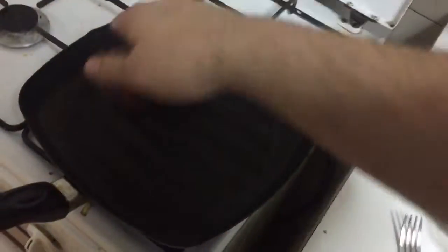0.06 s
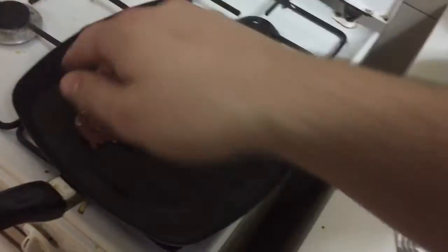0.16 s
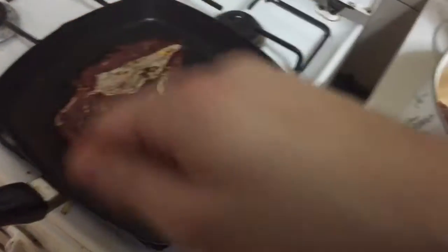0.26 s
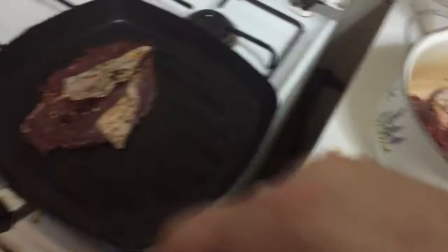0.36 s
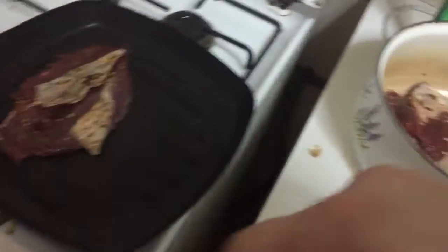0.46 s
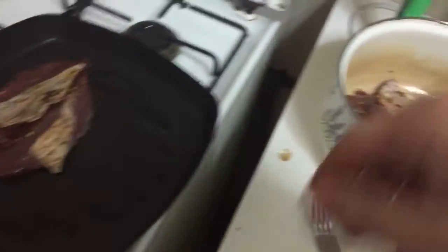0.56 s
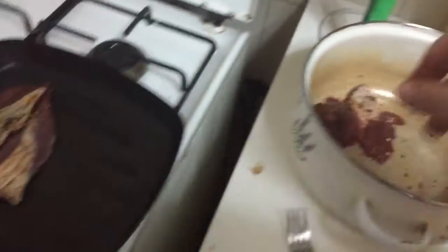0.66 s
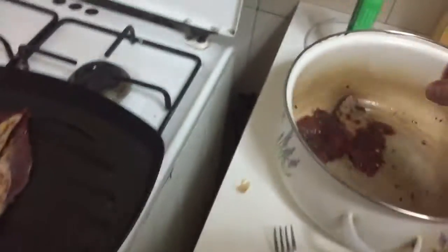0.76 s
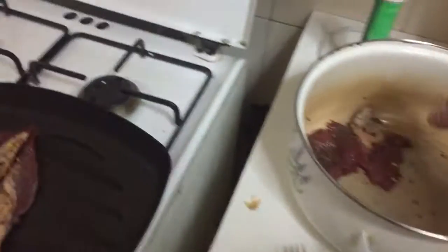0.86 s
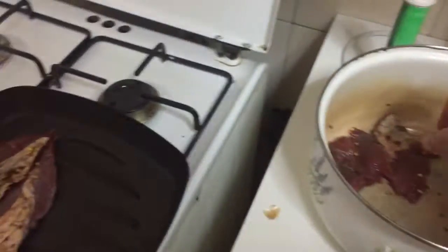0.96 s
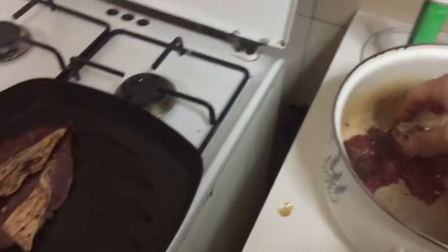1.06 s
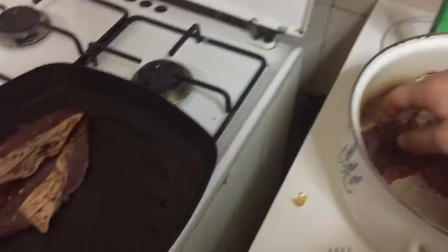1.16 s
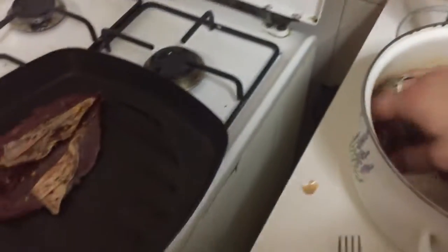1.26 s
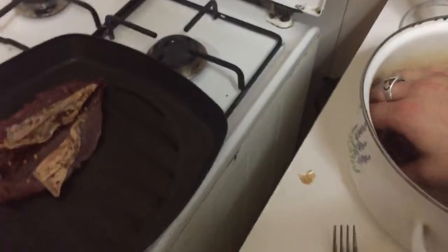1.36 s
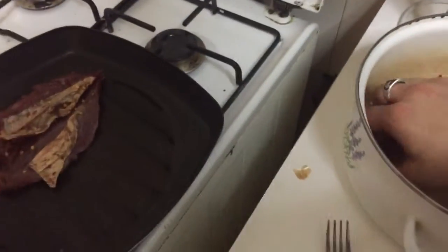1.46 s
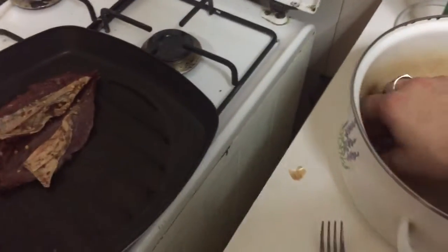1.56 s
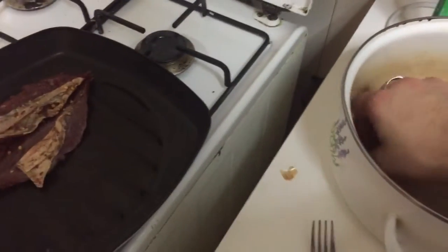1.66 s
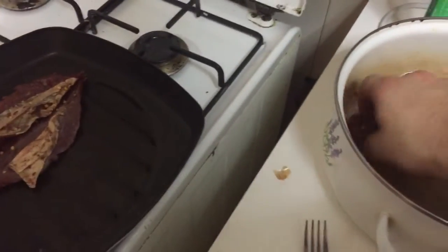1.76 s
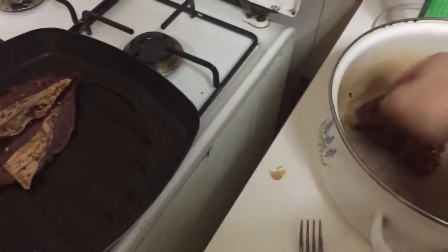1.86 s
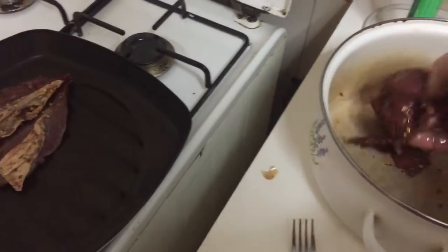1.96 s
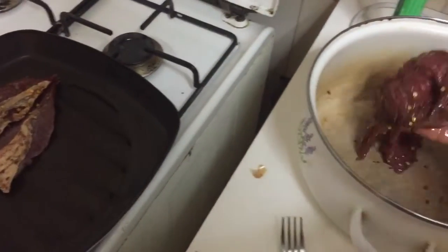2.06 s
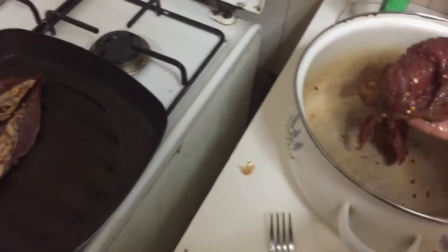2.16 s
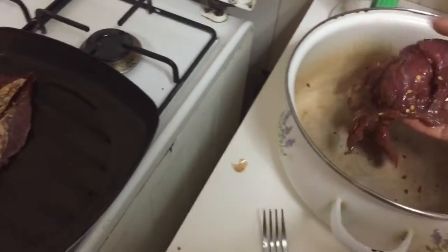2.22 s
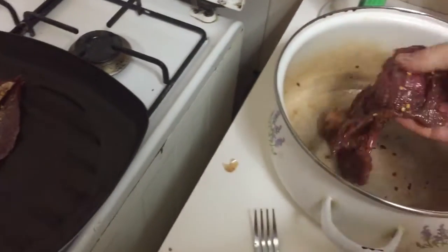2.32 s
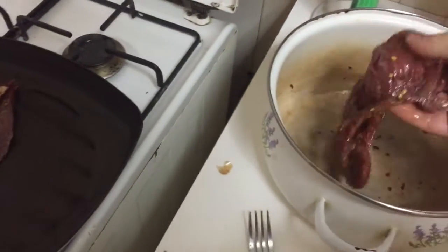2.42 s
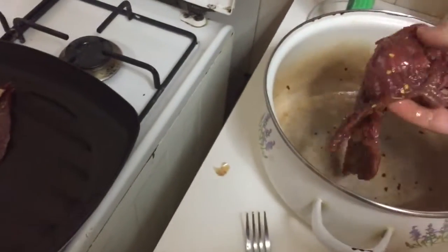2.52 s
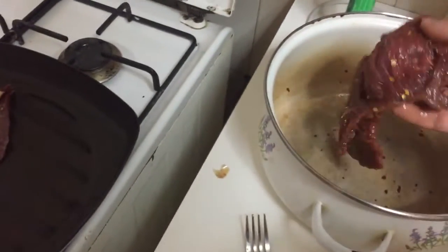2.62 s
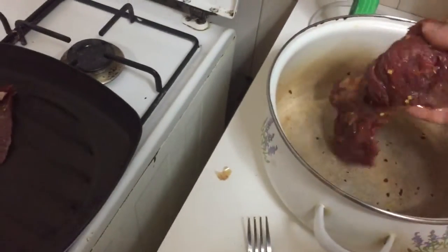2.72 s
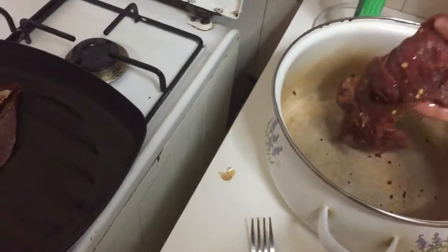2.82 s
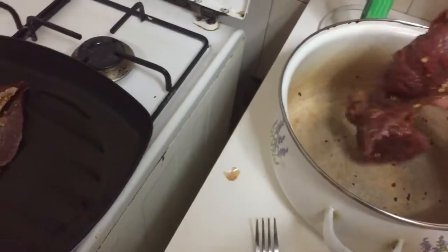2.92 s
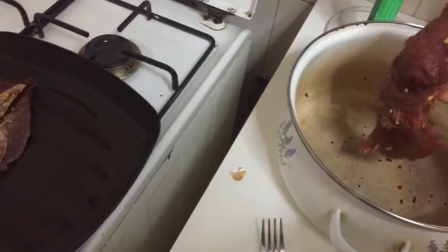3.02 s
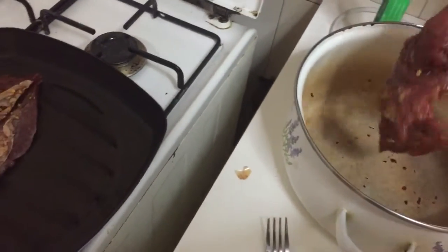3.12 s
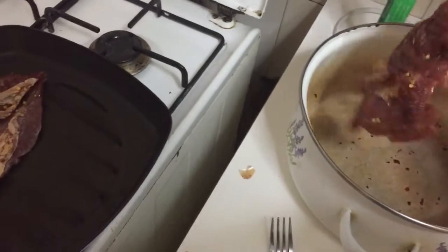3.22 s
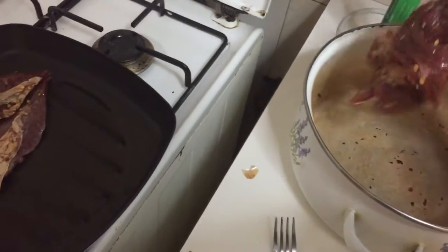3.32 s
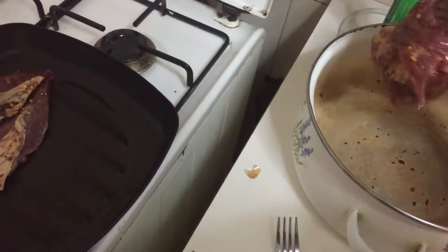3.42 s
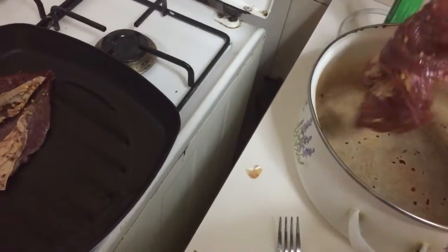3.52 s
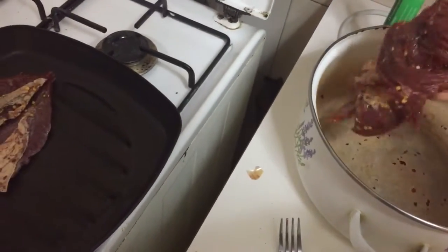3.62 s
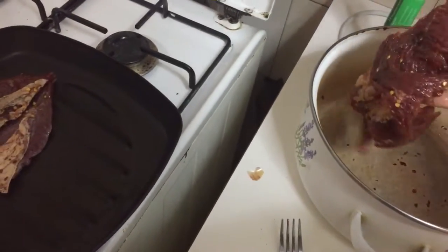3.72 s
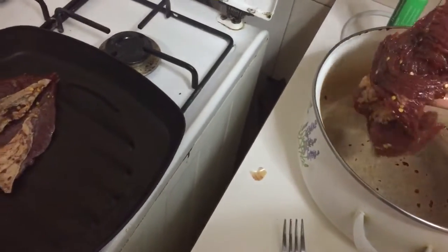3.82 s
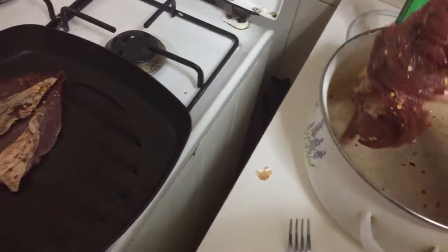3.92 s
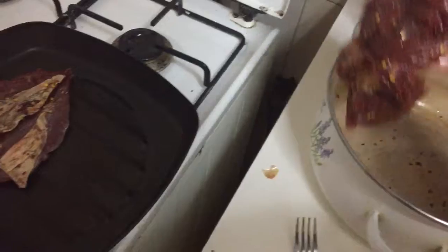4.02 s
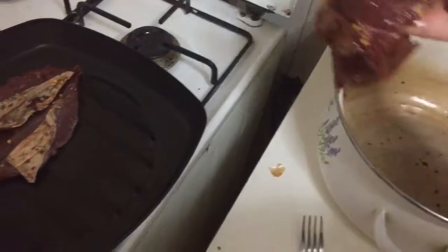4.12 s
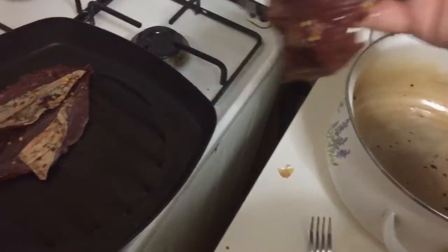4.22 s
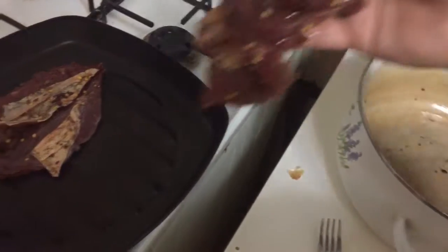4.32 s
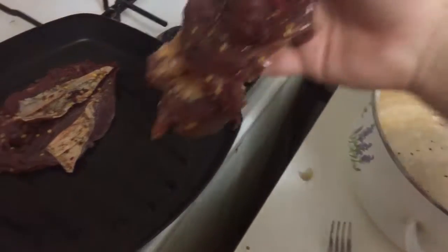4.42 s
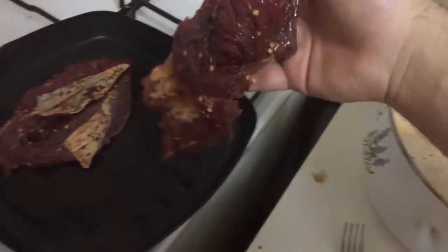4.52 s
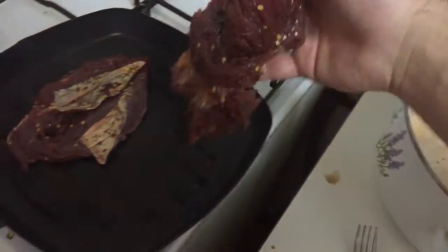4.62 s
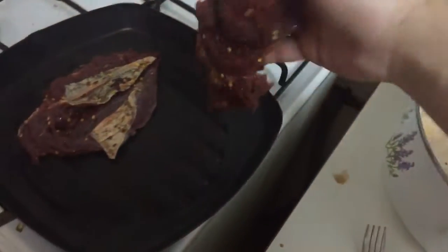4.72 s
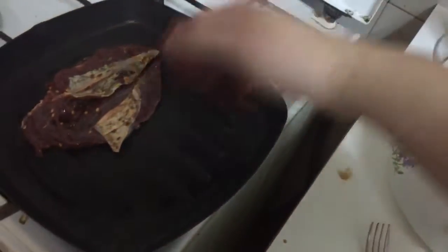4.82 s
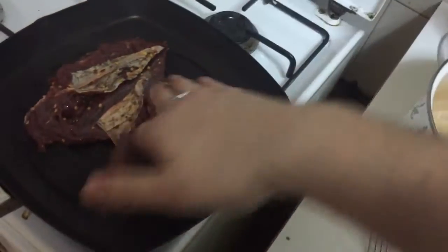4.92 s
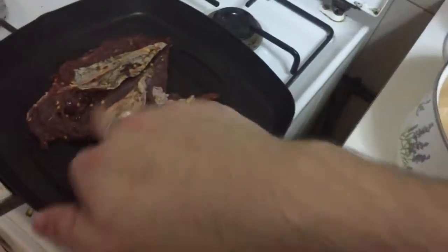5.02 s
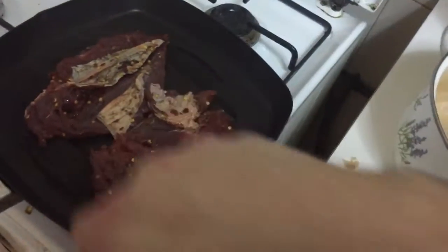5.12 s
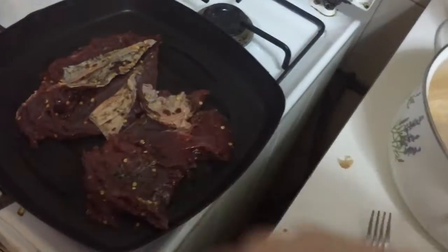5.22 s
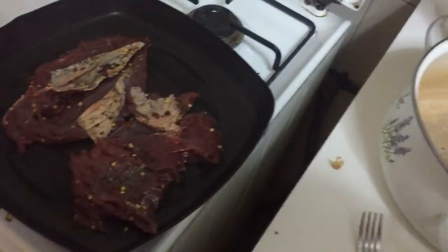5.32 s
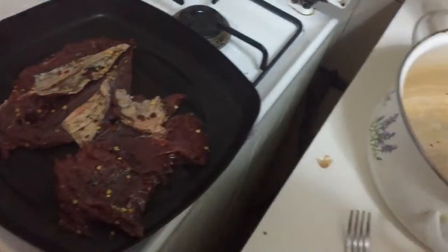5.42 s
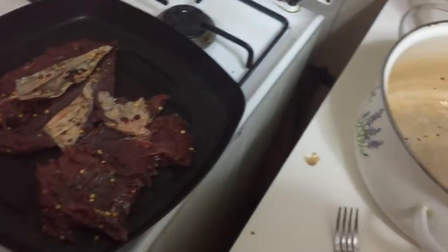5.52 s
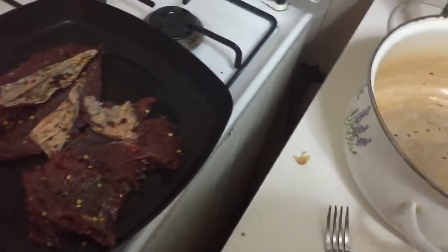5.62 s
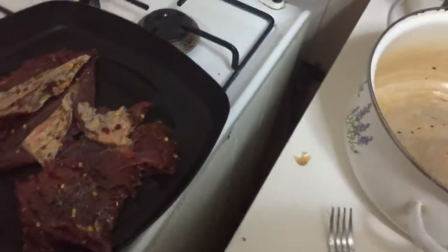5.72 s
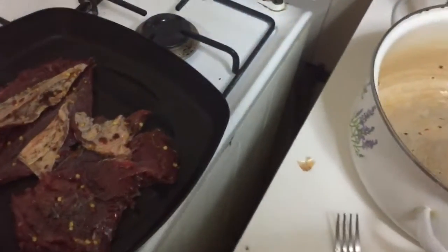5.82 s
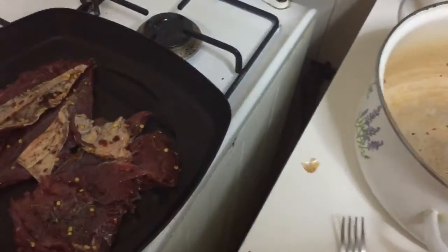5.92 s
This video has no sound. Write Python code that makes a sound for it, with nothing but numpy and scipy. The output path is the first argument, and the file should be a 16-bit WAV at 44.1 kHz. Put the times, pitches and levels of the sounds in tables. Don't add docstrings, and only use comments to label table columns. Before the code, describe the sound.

In a small kitchen, faint metal rings and a low gas rumble precede a fluttering slap as wet meat touches a very hot iron pan. Loud bright sizzling bursts out at once and continues with sharp pops and soft fat thumps. Around five seconds a second slice slaps down harder, and the sizzle grows fuller. Close microphone, short room reflections, nearly mono.

```python
import sys
import numpy as np
from scipy import signal
from scipy.fft import rfft, irfft, next_fast_len
from scipy.io import wavfile
from scipy.ndimage import uniform_filter1d, map_coordinates

SR = 44100
rng = np.random.default_rng(int(sys.argv[2]) if len(sys.argv) > 2 else 0)


def volts_from_db(level):
    exponent = np.asarray(level, float) / 20
    return 10 ** exponent


def int16_out(signal):
    q = np.round(np.clip(np.atleast_2d(signal).T, -1, 1) * 32767)
    wavfile.write(sys.argv[1], SR, q.astype(np.int16))


N = 263521
TIME = np.arange(N) / SR
DURATION_S = N / SR

# frequency_hz, density_db
FLAME_SPECTRUM = [(15, -35), (25, 10), (54, 16), (149, -7), (178, -16), (211, -7), (325, -3), (377, -40),
                  (400, -20.5), (520, -38), (880, -120)]
# frequency_hz, density_db
ROOM_SPECTRUM = [(88, -3), (150, -5), (201, -10.5), (264, -23), (429, -11), (784, -18), (881, -16),
                 (1250, -13.5), (2890, -24), (15700, -35)]
# peak_s, level_db, pitch_hz, width_hz, t60_s
STOVE_HUMS = [
    (.36, -46.5, 116, 18, 1.13),
    (.66, -61, 64.6, 5.8, 2.5),
    (1.27, -49, 63.5, 9.8, .4),
    (5.95, -45, 75, 32, .4),
]
# start_s, level_db, pitch_hz, t60_s
METAL_PINGS = [
    (0.0, -60, 1110, .4),
    (0.03, -56, 1110, .15),
    (0.143, -54, 1590, .13),
    (0.143, -57, 1982, .08),
    (0.195, -56, 580, .09),
]
# start_s, thump_db
FAT_DROPS = [
    (0.8406, -38.5),
    (1.4062, -52),
    (2.9818, -30.5),
    (3.9754, -45),
    (5.4889, -34),
    (5.8519, -44.5),
    (5.9737, -46),
]
# start_s, peak_db
LOUD_POPS = [(0.3074, -12), (.502, -10), (1.408, -7), (1.995, -8), (2.9825, -8), (3.4087, -12),
             (3.8599, -10), (3.976, -8), (4.5188, -10), (4.718, -11), (4.8842, -12), (4.957, -10),
             (5.1271, -12), (5.522, -7), (5.6617, -5), (5.719, -6)]
# start_s, level_db, t60_s
STEAM_JETS = [
    (.236, -38, .006),
    (2.9823, -13, .005),
    (2.9893, -30, .006),
    (3.0968, -17, 0.006),
    (5.057, -36, .012),
    (5.108, -26, 0.0088),
    (5.199, -25, .008),
    (5.573, -30, .006),
]
# pitch_hz, width_hz, first_slice_db, second_slice_db
PAN_MODES = [(74, 39, -4, -11), (107, 36, 1, -0.5), (198, 12, 1, -3), (242.7, 9.3, 5, 4.5),
             (337, 23, -1, -8), (413, 12, -1, 0.5), (479, 36, -7, -7), (620, 21, 0, -6), (720, 48, -8, -15),
             (842, 45, 5.5, 1)]
# start_s, blow_db
STEAM_SLAPS = [(0.231, -45), (0.246, -34.5), (0.262, -31.5), (.278, -32), (.29, -33), (0.314, -33),
               (.323, -33), (0.342, -30), (0.366, -31.5), (0.396, -38), (0.429, -40), (5.058, -41),
               (5.073, -35), (5.085, -30), (5.105, -25), (5.121, -22.5), (5.145, -21.5), (5.171, -25.5),
               (5.194, -23), (5.21, -29), (5.229, -26), (5.256, -37), (5.276, -30.5), (5.351, -36)]
# start_s, large_bubble_gush_db
SLICE_LANDINGS = [
    (.232, 24),
    (5.051, 16),
]
# time_s, vigour_db, fine_spray_db (spray reaching the microphone as the camera turns)
BOIL_VIGOUR = [(.212, -66, 12), (.25, -43, 2), (.29, -36, 0), (.39, -36.5, -2), (.5, -33.5, 1.5),
               (1.42, -34.5, 0), (1.55, -36, 0), (3.1, -38, 1.5), (3.4, -37.5, 2.5), (3.52, -38, 0),
               (4.01, -38, 2.5), (4.07, -39, 1), (4.33, -37.5, 3), (4.73, -38.5, -.5), (5.09, -38.5, 1),
               (5.22, -36, 0), (5.31, -31, -1.5), (5.98, -30.5, -3)]
# frequency_hz, density_db
LARGE_BUBBLES = [(400, -33), (740, -18.5), (853, -3), (960, -2.5), (1210, -4), (1280, -2), (1410, -2),
                 (1540, 5), (1720, 2), (2440, 3), (3600, -3.5)]
# frequency_hz, density_db
SMALL_BUBBLES = [(2600, -18), (3100, -9), (3800, 0), (4900, -4.5), (5250, -2), (6400, 1), (7500, -2.5),
                 (9300, 3.5), (10000, 2.5), (10450, 0), (11000, 4), (12200, 3), (13500, 2), (16000, 2.5)]
# frequency_hz, gain_db
WET_COLOUR = [(900, -1), (1550, -5), (2300, -4), (3300, 0.5), (6400, -1), (8000, -0.5), (9600, 0),
              (11000, -1.5)]
# frequency_hz, gain_db
SECOND_COLOUR = [(1100, -5), (1900, 2.5), (2400, -1), (3100, -9.5), (4100, 1.5), (5000, 0), (6300, 1.5),
                 (7900, -1.5), (9500, -4.5), (12000, -2)]
# pitch_hz, width_hz, level_db
RIB_MODES = [(306, 92, 0), (414, 22.4, 2.5), (505, 55, 0), (593, 27, 6), (672, 24, 1)]


def unit(x):
    return x / np.sqrt(np.mean(x ** 2) + 1e-20)


def along(points, hz):
    f, db = np.transpose(points)
    return volts_from_db(np.interp(np.log(hz + 1), np.log(f + 1), db))


def curves(rows):
    s, first, *others = np.transpose(rows)
    return [np.interp(TIME, s, first, -140, -140)] + [np.interp(TIME, s, c) for c in others]


def wobble(rate):
    knots = rng.standard_normal(int(N * rate / SR) + 4)
    return map_coordinates(knots, [TIME * rate])


def filtered(x, response):
    size = next_fast_len(N + SR // 2)
    return irfft(rfft(x, size) * response(np.fft.rfftfreq(size, 1 / SR)), size)[..., :N]


def above(hz, edge_hz):
    return 1 / (1 + (edge_hz / (hz + 1)) ** 16)


def resonances(modes):
    def response(f):
        total = 0
        for k, (hz, width, db) in enumerate(modes):
            damping = 1j * f * width
            total = total + (-1) ** k * volts_from_db(db) * damping / (hz * hz - f * f + damping)
        return total
    return response


def patchy(depth_db, bins=8, frames=10):
    z = signal.stft(rng.standard_normal(N), nperseg=512)[2]
    field = uniform_filter1d(rng.standard_normal(z.shape), size=bins, axis=0)
    field = uniform_filter1d(field, size=frames, axis=1)
    return unit(signal.istft(z * volts_from_db(depth_db * unit(field)), nperseg=512)[1][:N])


def bubbles(count, low_hz, high_hz, cycles, spread_db, size):
    u, t = rng.random((count, 3)), np.arange(size) / SR
    hz = (low_hz + (high_hz - low_hz) * u[:, 1])[:, None]
    strength = volts_from_db(spread_db * u[:, 2:] ** 2) * np.sqrt(hz)
    age = t * hz / cycles
    envelope = strength * age * np.exp(-2 * age) * np.hanning(2 * size)[size:]
    ring = envelope * np.sin(2 * np.pi * hz * t * (1 + 0.017 * age))
    at = (u[:, :1] * N).astype(int) + np.arange(size)
    return unit(np.bincount(at.ravel(), ring.ravel(), N + size)[:N])


def kitchen():
    flame = filtered(rng.standard_normal(N), lambda f: along(FLAME_SPECTRUM, f))
    flame = unit(flame * volts_from_db(0.78 * wobble(8)))
    flame_db = -68.5 + 7 * wobble(0.95)
    hiss = unit(filtered(patchy(0.98), lambda f: along(ROOM_SPECTRUM, f)))
    out = volts_from_db(flame_db) * flame + volts_from_db(-64.5) * hiss
    swell_db_per_s = 250
    for s, db, hz, width, t60 in STOVE_HUMS:
        fall_db = np.where(TIME < s, swell_db_per_s * (s - TIME), 60 * (TIME - s) / t60)
        mode = resonances([(hz, width, 0)])
        hum = unit(filtered(rng.standard_normal(N), lambda f: mode(f) ** 2))
        out += volts_from_db(db - fall_db) * hum
    return out


def walls(x, count=12):
    out, t = x.copy(), np.arange(SR // 5) / SR
    t60_s, first_echo_s, level_db = 0.078, .0015, -11
    for k in range(count + 1):
        share = np.clip(1 - np.abs(np.arange(N) * count / N - k), 0, 1) ** .5
        tail = volts_from_db(-60 * t / t60_s) * rng.standard_normal(len(t)) * (t > first_echo_s)
        tail *= volts_from_db(level_db) / np.linalg.norm(tail)
        part = np.flatnonzero(share)
        start = part[0]
        answer = signal.fftconvolve((share * x)[part], tail)[:N - start]
        out[start:start + len(answer)] += answer
    return out


def pings():
    out = np.zeros(N)
    for s, db, hz, t60 in METAL_PINGS:
        t = np.maximum(TIME - s, 0)
        rise = 1 - np.exp(-t / 0.0044)
        out += volts_from_db(db - 60 * t / t60) * rise * np.sin(2 * np.pi * hz * t)
    return out


def spatter():
    low, thin, t = np.zeros(N + SR), np.zeros(N + SR), np.arange(SR // 10) / SR
    swings = np.log1p(t / .00092) / np.log(1.85)
    thump = 1.75 * np.sin(np.pi * swings) * np.exp(-t / .014) * (1 - np.exp(-t / .0004))
    for s, db in FAT_DROPS:
        low[round(s * SR):][:len(t)] += volts_from_db(db) * thump

    small_pops = [(s * (DURATION_S - 1) + .5, -14 + 8 * (u - .5)) for s, u in rng.random((14, 2))]
    pop_hz = 10200
    click = -np.cos(2 * np.pi * pop_hz * (t[:5] - 1.8 / SR)) * np.hanning(9)[2:7]
    for s, db in LOUD_POPS + small_pops:
        crack = 0.55 * volts_from_db(-60 * t / 0.0025) * rng.standard_normal(len(t))
        crack[:5] = click
        thin[round(s * SR) - 2:][:len(t)] += volts_from_db(db - 6) * crack
    for s, db, t60 in STEAM_JETS:
        thin[round(s * SR):][:len(t)] += volts_from_db(db - 60 * t / t60) * rng.standard_normal(len(t))
    return low[:N] + filtered(thin[:N], lambda f: above(f, 1500) ** 0.2)


def flutter():
    drive, smack, modes = np.zeros((2, N)), np.zeros(N), np.array(PAN_MODES)
    hard_start, hard_end, soften_s = 1.4, 0.18, 0.033
    dull_hz, sharp_hz, puff_s = 250, 1510, .012
    smack_db, smack_hz = -0.5, 900
    for s, db in STEAM_SLAPS:
        which = int(s > DURATION_S / 2)
        since = max(s - SLICE_LANDINGS[which][0], 0)
        bright = np.clip(hard_end + (hard_start - hard_end) * np.exp(-since / soften_s), 0, 1)
        near = slice(round((s - .01) * SR), round((s + .08) * SR))
        t = TIME[near] - s + .004
        contact_s = 0.0012 / (1 + 5 * bright)
        push = np.exp(-(t / contact_s) ** 2) * 0.0013 / contact_s
        puff = volts_from_db(11.5) * np.exp(-np.abs(t) / puff_s) * (t > 0) * rng.standard_normal(len(t))
        edge_hz = dull_hz + (sharp_hz - dull_hz) * bright
        puff = signal.lfilter(*signal.butter(2, edge_hz, fs=SR), puff)
        drive[which, near] += volts_from_db(db) * (puff - push)
        smack[near] -= volts_from_db(db + smack_db) * push * bright
    bare = filtered(smack, lambda f: f / (f + smack_hz))
    first = filtered(drive[0], resonances(modes[:, :3]))
    second = filtered(drive[1], resonances(modes[:, [0, 1, 3]]))
    return bare + first + second


def boiling():
    spit_db, aim_db = curves(BOIL_VIGOUR)
    spray_db = spit_db + aim_db + 2
    gush_rise_s, gush_fade_s = .004, .014
    gush_db = 0
    for s, db in SLICE_LANDINGS:
        rise = np.clip((TIME - s) / gush_rise_s, 0, 1)
        gush_db = gush_db + db * rise * np.exp(-np.maximum(TIME - s, 0) / gush_fade_s)
    excess_db = spit_db + 38
    large_db = -42 + gush_db + np.minimum(0.82 * excess_db, 6 + excess_db)

    (first_s, _), (later_s, _) = SLICE_LANDINGS
    wet_s, drying_s, spread_s, second_share = 0.32, 0.5, 0.33, 0.69
    fresh = np.clip(1 - (TIME - first_s - wet_s) / drying_s, 0, 1)
    second = second_share * np.clip((TIME - later_s) / spread_s, 0, 1)
    return spray_db, spit_db, large_db, fresh, second


def sizzle():
    spray_db, spit_db, large_db, fresh, second = boiling()
    ruptures = unit(-volts_from_db(20 * rng.random(N) ** 2) * (rng.random(N) < .02))
    rings = bubbles(count=9000, low_hz=298, high_hz=15530, cycles=4.2, spread_db=5.5, size=256)
    squeaks = bubbles(count=2500, low_hz=376, high_hz=15710, cycles=68, spread_db=-8, size=1200)
    hiss = patchy(1.58, bins=3, frames=24)
    burst = volts_from_db(0.077 * wobble(40) + 0.14 * wobble(9.9))
    boil = burst * (hiss + volts_from_db(-8.5) * ruptures + volts_from_db(-7.5) * rings + volts_from_db(-15) * squeaks)
    wet = filtered(boil, lambda f: along(WET_COLOUR, f))
    later = filtered(boil, lambda f: along(SECOND_COLOUR, f))
    boil = (1 - fresh - second) * boil + fresh * wet + second * later

    spray = filtered(boil, lambda f: along(SMALL_BUBBLES, f) * above(f, 9580) ** .5)
    spit = filtered(boil, lambda f: along(SMALL_BUBBLES, f) * np.abs(above(f, 2900) - above(f, 8300)) ** .5)
    large = filtered(boil, lambda f: along(LARGE_BUBBLES, f) * (1 - above(f, 3230)) ** .5)
    large *= volts_from_db(0.37 * wobble(5.9))
    ribs = resonances(RIB_MODES)
    iron = patchy(6.9, bins=2, frames=8) + volts_from_db(-3) * ruptures
    iron = filtered(iron, lambda f: ribs(f) * (1 - above(f, 716)))
    low = unit(large) + volts_from_db(-21.5) * unit(iron)
    return volts_from_db(spray_db) * unit(spray) + volts_from_db(spit_db) * unit(spit) + volts_from_db(large_db) * low


def scene():
    mono = kitchen() + pings() + spatter() + flutter() + walls(sizzle())
    return np.array([mono, mono])


def low_pass(x):
    return signal.sosfilt(signal.butter(12, 17080, fs=SR, output="sos"), x)


def record(dry):
    side = np.zeros(N)
    for when, where in rng.random((18, 2)):
        s = .5 + when * (DURATION_S - 1)
        low_hz = 4600 + where * (13500 - 4600)
        high_hz = low_hz * 1.18
        near = slice(round(s * SR) - 4096, round(s * SR) + 2048)
        f = np.fft.rfftfreq(6144, 1 / SR)
        block = np.cos(np.pi / 2 * np.clip((TIME[near] - s) / .023, -1, 1))
        band = irfft(rfft(dry[0, near]) * (f > low_hz) * (f < high_hz))
        usual, swapped = block * band, block * band[::-1]
        side[near] += volts_from_db(-3.0) * swapped * np.sqrt(np.mean(usual ** 2) / np.mean(swapped ** 2))

    def response(f):
        top_hz, edge_hz, bottom_hz = 15710, 90, 38
        top = np.sin(np.pi / 2 * np.clip((top_hz + edge_hz / 2 - f) / edge_hz, 0, 1)) ** 2
        return top / (1 + (bottom_hz / (f + 1)) ** 4)

    return low_pass(filtered(dry + [side, -side], response))


dry = scene()
out = record(dry)
int16_out(out)
```